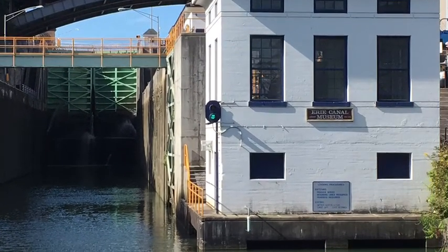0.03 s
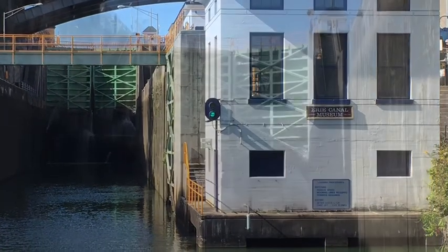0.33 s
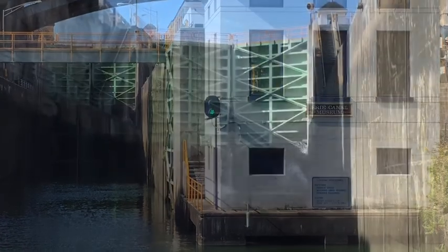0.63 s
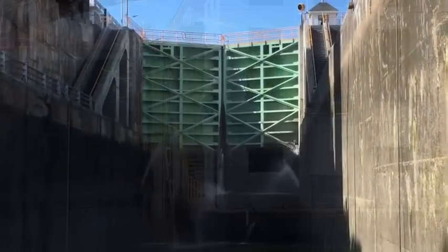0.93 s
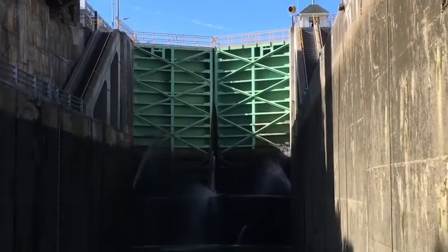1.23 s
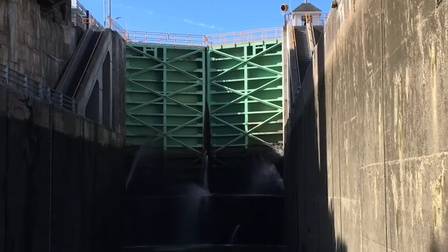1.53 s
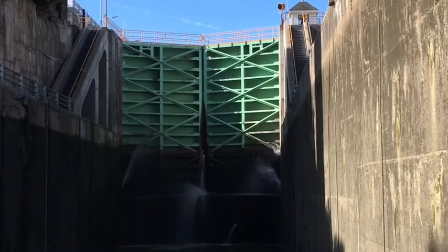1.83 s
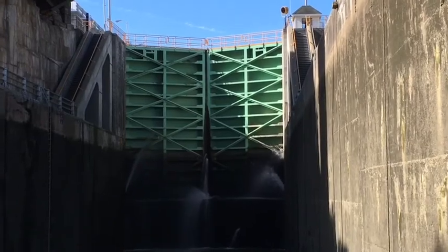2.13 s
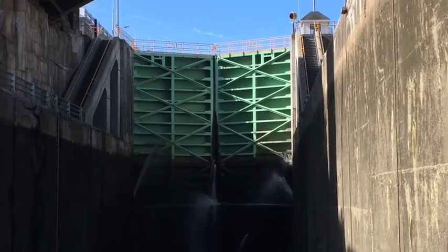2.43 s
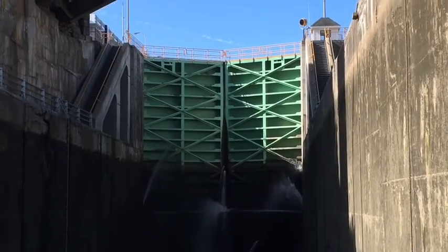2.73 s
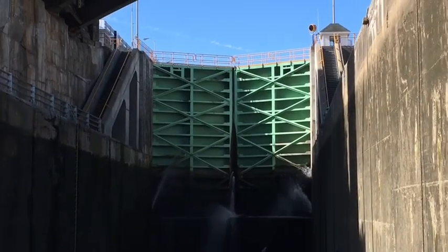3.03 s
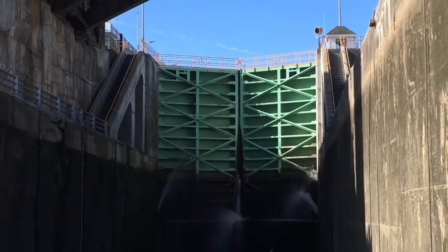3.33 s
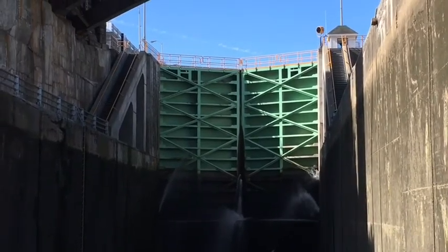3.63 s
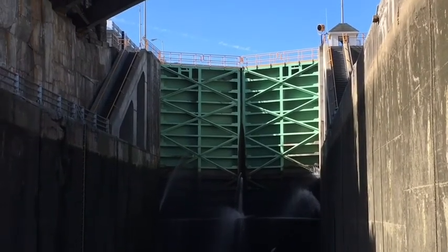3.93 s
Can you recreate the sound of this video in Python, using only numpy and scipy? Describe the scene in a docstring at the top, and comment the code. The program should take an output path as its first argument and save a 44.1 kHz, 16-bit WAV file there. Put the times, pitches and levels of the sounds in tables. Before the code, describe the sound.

Water rushes and sprays through canal lock gates while a boat engine throbs close by.

```python
"""Rushing water fades in over the first second: it sprays through the leaking gates of a canal lock
and plunges into the stone chamber, some distance from the microphone. Close by, a boat engine throbs
with its uneven firings and speeds up a little, over its own exhaust rumble and a thin machine hum.
A faint, distant tone rings once, and one short spurt of hiss comes near the end. Heard in mono."""
import sys
import numpy as np
from scipy import signal
from scipy.fft import rfft, irfft
from scipy.io import wavfile
from scipy.ndimage import uniform_filter1d

SR = 44100
rng = np.random.default_rng(int(sys.argv[2]) if len(sys.argv) > 2 else 0)


def file_out(sig):
    """Save sig as 16-bit WAV at sys.argv[1]."""
    # one column per channel
    cols = np.atleast_2d(sig).T
    # limit, then scale
    lim = np.clip(cols, -1, 1)
    pcm = np.round(lim * 32767).astype(np.int16)
    wavfile.write(sys.argv[1], SR, pcm)


N = 176400
TIME = np.arange(N) / SR
FREQS = np.fft.rfftfreq(N, 1 / SR)


def gain_of(db):
    """Decibels to gain."""
    return 10 ** (np.asarray(db) / 20)


def unit_rms(x):
    """Scales to rms 1."""
    return x / np.sqrt(np.mean(abs(x) ** 2) + 1e-20)


def envelope(points):
    """Gain along straight lines in dB between (time_s, level_db) points."""
    return gain_of(np.interp(TIME, *np.transpose(points)))


def coloured(x, spectrum):
    """Filters x through (freq_hz, relative_db) points, at rms 1."""
    hz, db = np.transpose(spectrum)
    response = gain_of(np.interp(np.log(FREQS + 1), np.log(hz), db))
    return unit_rms(irfft(rfft(x) * response, N))


def drift(rate_hz):
    """Slow random motion of rms 1, up to about the given rate."""
    return unit_rms(irfft(rfft(rng.standard_normal(N)) * np.exp(-(FREQS / rate_hz) ** 2), N))


def tone(turns, wander, wander_hz):
    """A tone of rms 1 whose strength and phase waver."""
    waver = 1 + wander * (drift(wander_hz) + 1j * drift(wander_hz)) / np.sqrt(2)
    return unit_rms((waver * np.exp(2j * np.pi * turns)).real)


def churn(patch_db, patch_hz, patch_s, flicker_db):
    """Noise with loud and soft patches in time and pitch, and a quick flicker shared by all pitches."""
    size, hop = 512, 128
    frames = signal.stft(rng.standard_normal(N), nperseg=size, noverlap=size - hop)[2].T
    patches = rng.standard_normal(frames.shape)
    patches = uniform_filter1d(patches, round(patch_s * SR / hop), axis=0)
    patches = unit_rms(uniform_filter1d(patches, round(patch_hz * size / SR), axis=1))
    flicker = unit_rms(uniform_filter1d(rng.standard_normal(len(frames)), size=4))
    frames *= gain_of(patch_db * patches + flicker_db * flicker[:, None])
    return unit_rms(signal.istft(frames.T, nperseg=size, noverlap=size - hop)[1][:N])


# Colour of the water falling into the chamber: freq_hz, relative_db
RUSH_SPECTRUM = [(100, 2), (260, 2.5), (430, -3), (650, 1), (1000, 1.5), (1500, 0), (2100, -4),
                 (3000, -9.5), (5000, -15.5), (16000, -32)]
# Its strength from a distance: time_s, level_db
RUSH_LEVELS = [(0, -31), (1, -31), (1.7, -31.5), (2.7, -32.5), (3.4, -32.5), (4, -31)]

def water_rush():
    """Leaking water plunges into the stone chamber, some way off."""
    water = churn(patch_db=1.0, patch_hz=301.2, patch_s=0.034, flicker_db=0.13)
    return envelope(RUSH_LEVELS) * coloured(water, RUSH_SPECTRUM)


# Colour of the spray at the gates: freq_hz, relative_db
SPRAY_SPECTRUM = [(500, -15), (1800, -10), (3000, -0.5), (4300, -1), (5600, 1.5), (6600, 1), (7600, -3.5),
                  (8900, -1.5), (9900, -2.5), (11500, -5.5), (13500, -10), (15700, -14)]
# Its strength from a distance: time_s, level_db
SPRAY_LEVELS = [(0, -34.5), (1.2, -35), (2.6, -36), (4, -35)]

def gate_spray(drops_per_s=3000, drop_spread_db=3, drop_gain=0.24):
    """Jets from the gate seams break into mist and a dense patter of drops."""
    mist = churn(patch_db=0.64, patch_hz=700, patch_s=0.043, flicker_db=0.0)
    sizes = gain_of(drop_spread_db * np.minimum(rng.exponential(1, N), 4))
    signs = rng.choice([-1, 1], N)
    landings = rng.random(N) < drops_per_s / SR
    drops = unit_rms(sizes * signs * landings)
    return envelope(SPRAY_LEVELS) * coloured(mist + drop_gain * drops, SPRAY_SPECTRUM)


# Colour of the spurt: freq_hz, relative_db
SPURT_SPECTRUM = [(1500, -28), (3000, -3), (4100, 3), (5500, 1), (9000, -9), (13000, -9), (15200, -14)]

def spurt(peak_s=3.549, width_s=0.014, peak_db=-32):
    """One brief burst of hiss stands out of the spray."""
    swell = np.exp(-0.5 * ((TIME - peak_s) / width_s) ** 2)
    return gain_of(peak_db) * swell * coloured(rng.standard_normal(N), SPURT_SPECTRUM)


# The boat engine running near the microphone: time_s, cycle_hz, firing_db, uneven_beat_db
ENGINE_RUN = [(0.2, 18.0, -28, -28), (0.55, 18.12, -24, -38), (0.9, 18.42, -19, -26),
              (1.3, 18.95, -22, -23), (1.7, 19.47, -16, -27), (2.1, 19.65, -16, -20),
              (2.45, 19.74, -15, -17), (2.8, 19.94, -17, -16), (2.95, 20.03, -19, -21),
              (3.25, 20.1, -16, -24), (3.45, 20.06, -25, -19), (3.62, 20.02, -29, -18),
              (3.95, 19.94, -35, -27)]
# Exhaust harmonics, even ones relative to the firing note, odd to the uneven beat: order, relative_db
EXHAUST_ORDERS = [(2, -11), (3, -0.3), (4, -0.2), (5, -9.5), (6, -14.5), (7, -27.5), (8, -21), (9, -28),
                  (10, -34.5), (11, -32)]

def boat_engine(pipe_smear_turns=0.0755):
    """Four firings a cycle, unequal in strength: the orders line up into one throb per cycle."""
    time_s, _, firing_db, uneven_beat_db = np.transpose(ENGINE_RUN)
    cycles = engine_cycles()
    throb = np.zeros(N)
    for order, relative_db in EXHAUST_ORDERS:
        level_db = np.interp(TIME, time_s, uneven_beat_db if order % 2 else firing_db)
        apart = abs(order - 4)  # orders far from the firing note waver more
        turns = order * cycles + pipe_smear_turns * apart ** 2  # the pipe spreads each throb
        harmonic = tone(turns, wander=0.15 * (1 + 0.45 * apart), wander_hz=3.5)
        throb += gain_of(level_db + relative_db) * harmonic
    return throb


def engine_cycles(throb_at_s=2.418):
    """Engine cycles, counted from one throb."""
    time_s, cycle_hz = np.transpose(ENGINE_RUN)[:2]
    turns = np.cumsum(np.interp(TIME, time_s, cycle_hz)) / SR
    return turns - np.interp(throb_at_s, TIME, turns)


# Colour of the exhaust between the lock walls: freq_hz, relative_db
RUMBLE_SPECTRUM = [(22, -12), (33, -6), (44, -7.5), (56, 0.5), (70, 3.5), (90, -2), (112, -1), (132, -9.5),
                   (155, -19), (185, -13.5), (230, -34.5), (330, -29), (600, -73)]
# Its strength close by: time_s, level_db
RUMBLE_LEVELS = [(0, -19.5), (.5, -18.5), (1.05, -18.5), (1.55, -17.5), (2.1, -25), (2.9, -20.5),
                 (3.4, -23), (4, -23.5)]

def exhaust_rumble(throb_depth=0.14):
    """The exhaust gurgles between the lock walls, swelling with each engine cycle."""
    swell = 1 + throb_depth * np.cos(2 * np.pi * engine_cycles())
    puffs = swell * rng.standard_normal(N)
    return envelope(RUMBLE_LEVELS) * coloured(puffs, RUMBLE_SPECTRUM)


# Machine tones behind the engine: pitch_hz, midway_level_db
HUM_TONES = [(338.5, -47), (6440, -63)]

def machine_hum(rise_db_per_s=1.5):
    """Thin, wavering machine tones slowly grow louder."""
    tones = sum(gain_of(db) * tone(hz * TIME, wander=0.6, wander_hz=5.4) for hz, db in HUM_TONES)
    return tones * gain_of(rise_db_per_s * (TIME - TIME.mean()))


def distant_ring(start_s=1.545, pitch_hz=662, level_db=-40, attack_s=0.035, fall_db_per_s=22):
    """Far off, a faint wavering tone comes up quickly and dies away in the chamber."""
    age_s = np.maximum(TIME - start_s, 0)
    attack = np.minimum(age_s / attack_s, 1)
    decay = gain_of(level_db - fall_db_per_s * age_s)
    return attack * decay * tone(pitch_hz * TIME, wander=0.78, wander_hz=14)


def scene():
    """At the lock, in one channel: water at a distance, the engine close by."""
    water = water_rush() + gate_spray() + spurt()
    boat = boat_engine() + exhaust_rumble() + machine_hum()
    return (water + boat + distant_ring())[None]


# Dips in the microphone's response: centre_hz, width_hz, depth_db
MICROPHONE_DIPS = [(4930, 204, 3.5), (10420, 290, 4.5)]

def record(dry, low_cut_hz=29, high_cut_hz=15720, fade_start_s=0.051, fade_end_s=1.06):
    """The microphone's colour and low cut, a straight fade-in and a steep high cut."""
    dips_db = sum(db * np.exp(-0.5 * ((FREQS - hz) / width) ** 2) for hz, width, db in MICROPHONE_DIPS)
    low_cut = 1 / np.sqrt(1 + (low_cut_hz / (FREQS + 1)) ** 12)
    picked_up = irfft(rfft(dry) * gain_of(-dips_db) * low_cut, N)
    fade_in = np.clip((TIME - fade_start_s) / (fade_end_s - fade_start_s), 0, 1)
    high_cut = signal.firwin(1023, high_cut_hz, window=("kaiser", 9), fs=SR)
    return signal.oaconvolve(picked_up * fade_in, high_cut[None], "same")


dry = scene()
out = record(dry)
file_out(out)
```